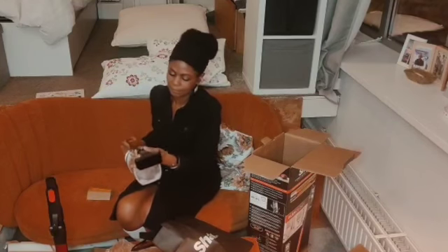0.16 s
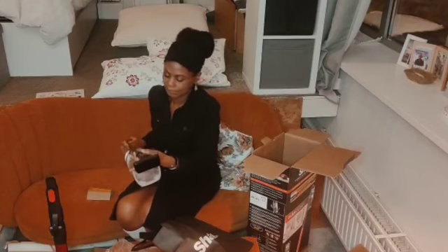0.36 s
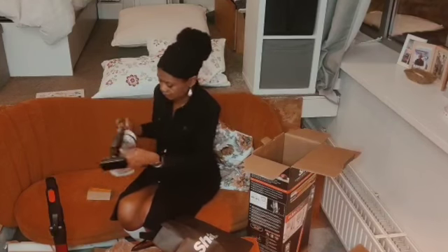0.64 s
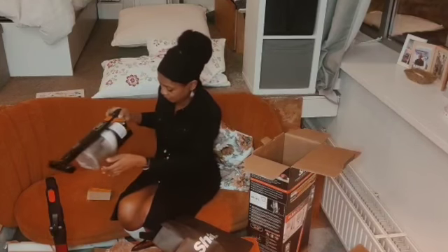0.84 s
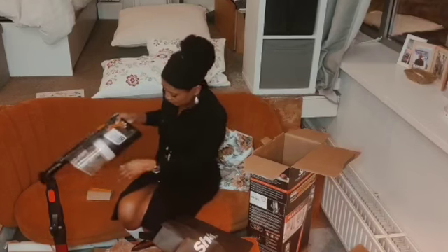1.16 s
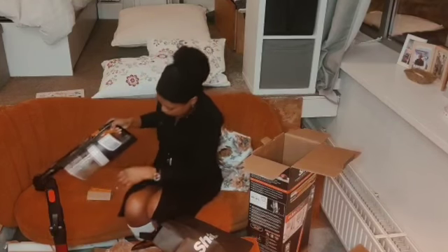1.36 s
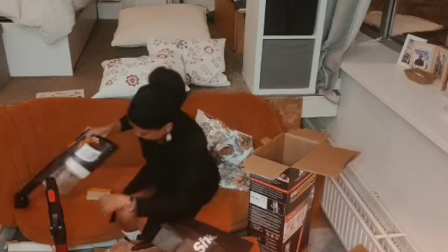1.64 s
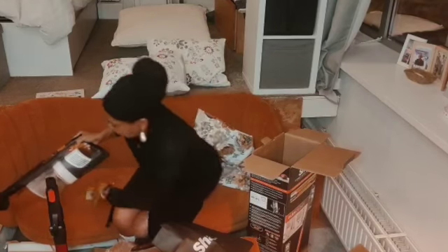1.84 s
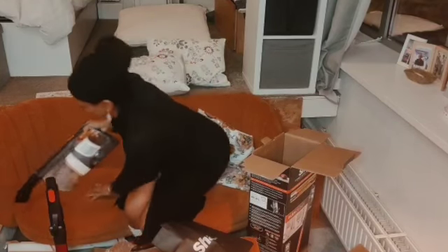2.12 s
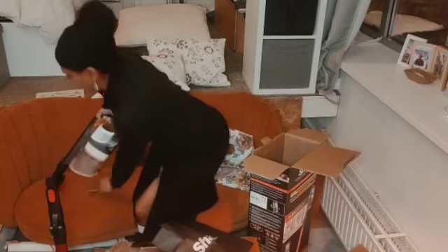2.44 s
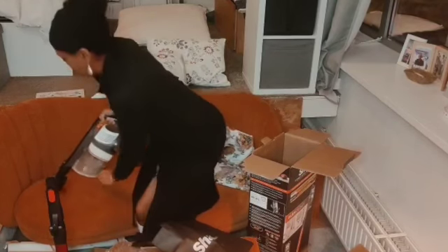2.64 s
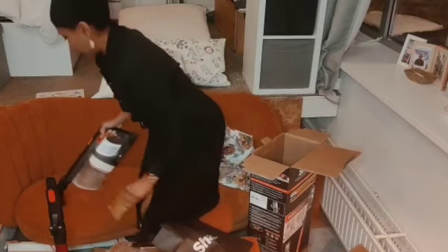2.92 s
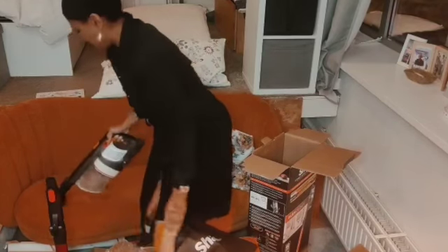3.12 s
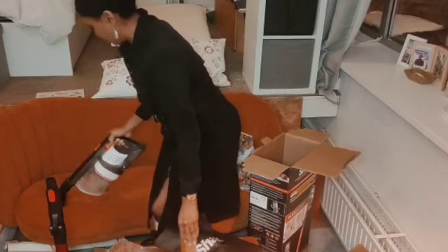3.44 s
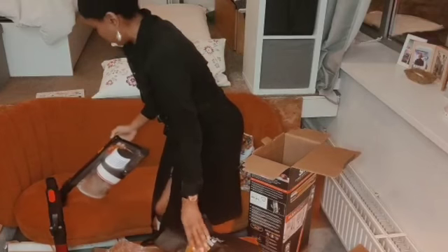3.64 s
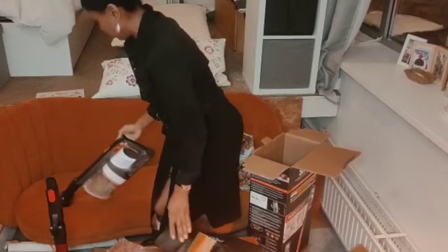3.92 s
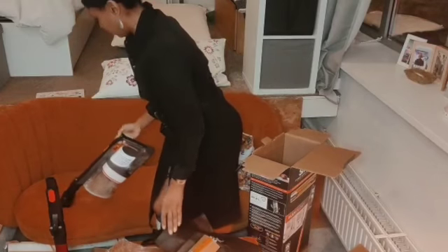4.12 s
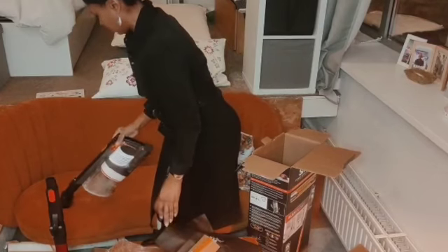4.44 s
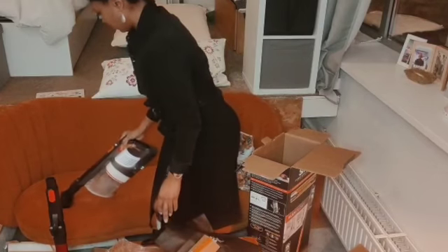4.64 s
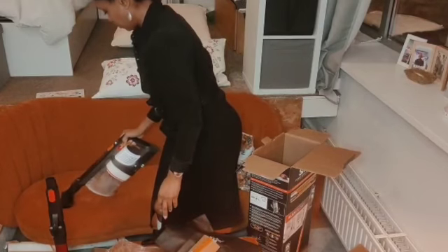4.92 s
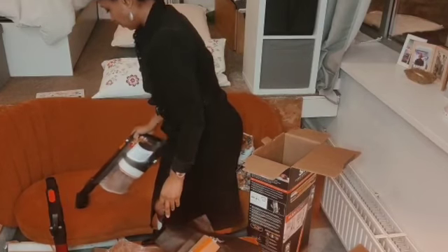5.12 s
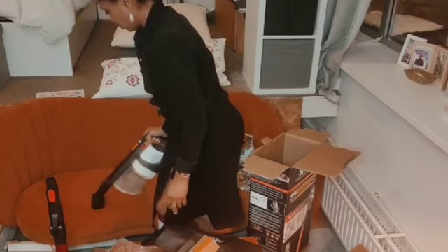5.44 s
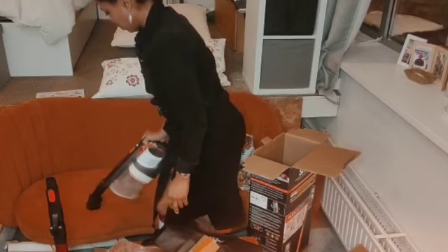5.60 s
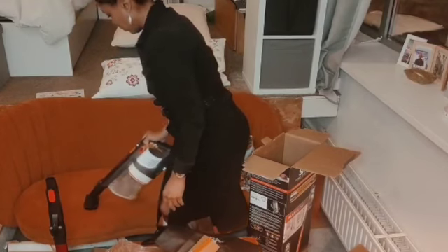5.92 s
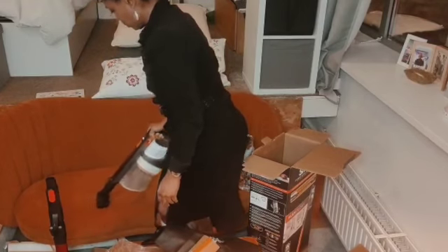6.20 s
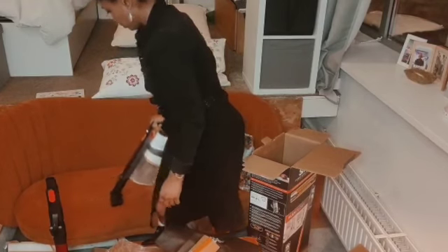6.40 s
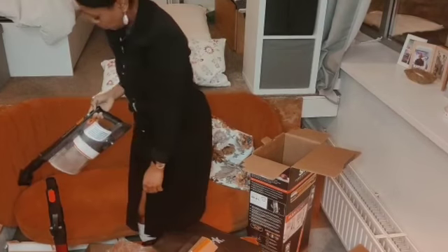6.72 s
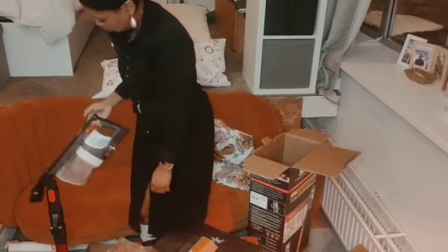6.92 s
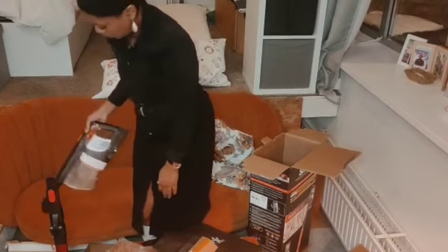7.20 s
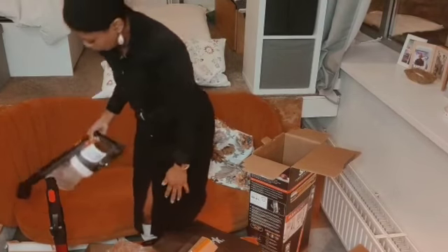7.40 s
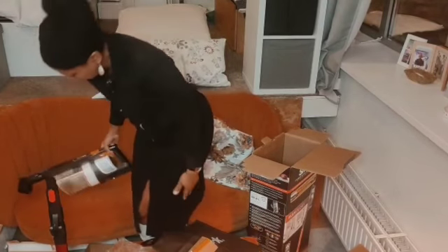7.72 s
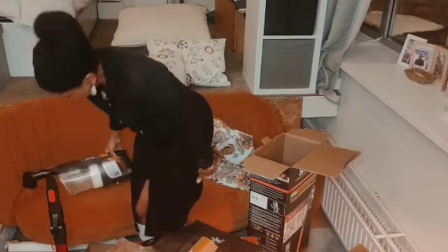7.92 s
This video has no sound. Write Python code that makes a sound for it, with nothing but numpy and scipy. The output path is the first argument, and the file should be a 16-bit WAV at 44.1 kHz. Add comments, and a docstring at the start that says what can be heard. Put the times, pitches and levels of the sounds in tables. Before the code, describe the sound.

A sharp plastic snap from a handheld vacuum opens the scene, heard in stereo in a small, quiet room. Cloth brushes and a hand slides over upholstery as a knee lands on a sofa with a dull thump. Light taps on a table follow. Then the vacuum spins up with a rising whine and airy hiss, runs for about two seconds, dulls as the nozzle meets the cushion, and coasts down with a falling whistle.

```python
"""A dust bin snaps shut in a small room: impacts ring the plastic shell of a handheld vacuum. Cloth rustles by
friction, a hand slides, a knee thumps the sofa and a small part taps on the table. The switch clicks; the motor
spins up with a whine, labours as the nozzle seals on the cushion; at 6.56 s its tones and rush fall abruptly,
and it coasts down. Its tones are multiples of the shaft's rotation rate, and the same rate governs the
turbulent rush of air."""
import sys
import numpy as np
from scipy import signal
from scipy.fft import rfft, irfft, next_fast_len
from scipy.io import wavfile
from scipy.ndimage import uniform_filter1d

SR = 44100
rng = np.random.default_rng(int(sys.argv[2]) if len(sys.argv) > 2 else 0)


def waveform_to_disk(signal):
    """Save audio, clipped to [-1, 1], as 16-bit WAV at the path in sys.argv[1]."""
    frames = np.transpose(np.atleast_2d(signal))
    scaled = np.clip(frames, -1, 1) * 32767
    samples = np.round(scaled).astype(np.int16)
    wavfile.write(sys.argv[1], SR, samples)


N = 355269
TIME = np.arange(N) / SR
SWITCH_ON_S, SEAL_S, SPEED_DROP_S = 4.608, 5.88, 6.557
GOVERNED_HZ = 1136  # full shaft speed

# Reverberation time of the room: frequency_hz, t60_s
ROOM_DECAY = [(100, 0.97), (300, 0.36), (700, 0.43), (2000, 0.4), (4000, 0.4), (5500, 0.38), (8000, .28),
              (12000, 0.25)]
# Broad spectra of room noise, cloth, taps, clicks and rushing air: frequency_hz, gain_db
ROOM_SPECTRUM = [(18, -42.5), (30, -10), (65, -26), (91, -6.5), (156, -13), (223, -7), (267, -19.5),
                 (691, -16.5), (1070, -21), (14000, -29)]
CLOTH_SPECTRUM = [(30, -5.5), (60, -0.5), (100, 9), (200, 11), (400, 8.5), (900, 5), (1500, 1.5),
                  (2600, 0.5), (5000, 0), (6500, 1.5), (7600, -0.5), (9500, -7.5), (14000, -15)]
TAP_SPECTRUM = [(80, -30.5), (170, -13.5), (300, -12.5), (800, -5.5), (2000, 4), (4500, -2.5), (6500, 2.5),
                (9000, -3.5), (14000, -14)]
CLICK_SPECTRUM = [(40, -43.5), (90, -29.5), (180, -18.5), (330, -10), (520, -17.5), (950, -11), (1800, 1),
                  (2900, -2), (4000, -6), (5400, -7), (7300, -3.5), (9800, -12), (14000, -21)]
AIR_SPECTRUM = [(40, -38), (80, -27.5), (150, -14.5), (280, -12.5), (450, -7), (750, -5), (1100, -5),
                (1700, -5.5), (2500, -7.5), (4500, -2.5), (6400, -5.5), (7500, -8), (10500, -18),
                (14000, -29)]
# Resonances: centre_hz, width_hz, lift_db
ROOM_MODES = [(105, 5, 2.3)]
PART_MODES = [(175.4, 14, 14.5), (958, 15, 12), (1310, 34, 6), (1750, 75, 4), (2280, 50, 4.5),
              (2800, 65, 0), (3210, 55, 9.5), (4040, 64, 9.5)]  # small part and table
SHELL_MODES = [(578, 8.9, 15.5), (1476, 15, 9), (1680, 30, -2), (1755, 29, 6.5), (2200, 30, 2.5),
               (2540, 17, 7.5), (2780, 30, 5.5), (3260, 210, 3), (5150, 90, 10), (5200, 35, 5),
               (5810, 89, 9.5), (6800, 69, 4.5)]  # plastic shell
DUCT_MODES = [(592, 17, 8), (635, 48, 3.5), (935, 36, 6.5), (1140, 87, 5), (1510, 300, 4.5),
              (6200, 710, 2.5)]  # air in the nozzle and bin
HOUSING_MODES = [(372, 18.4, 15.5), (556, 38, 13), (828, 61, 16.5), (965, 10.5, 14), (1110, 14.5, 10.5)]  # motor housing

# Rustle of clothes as the body moves: time_s, level_db
RUSTLE_LEVELS = [(0, -70.5), (1.35, -76), (1.8, -68.5), (2.6, -59.5), (3.1, -60), (3.35, -58.5),
                 (3.5, -64.5), (3.95, -64), (4.45, -71), (7.5, -65), (7.95, -64), (8.05, -70)]
# Brushes of cloth and, at 7.55 s, a soft low rumble as the motor runs down:
# peak_s, level_db, rise_s, fall_s, brightness_db
SWELLS = [(.595, -65.5, .018, .02, 1.5), (.68, -63, 0.033, 0.032, 7), (1.72, -75, 0.18, 0.078, -13.5),
          (2.316, -43, 0.05, 0.056, 4), (2.495, -50.5, 0.059, 0.047, 3.5), (4.34, -64.5, 0.016, 0.08, -3),
          (7.55, -70.5, .35, 0.39, -9), (7.97, -68, .03, .06, -10.5)]
# A hand sliding over the upholstery: time_s, level_db, pitch_hz
HAND_PATH = [(1.95, -100, 1508), (2.08, -65, 1440), (2.18, -68, 1436), (2.26, -53, 1420), (2.31, -54, 1200),
             (2.36, -45.5, 1007), (2.42, -59, 944), (2.55, -100, 952)]
# Weight landing on the sofa: start_s, level_db
KNEE_LANDINGS = [(2.328, -20.5), (2.438, -34.5)]
# Modes of the sofa frame: pitch_hz, gain_db, t60_s
FRAME_MODES = [(96.6, -4.5, 0.19), (120, -3.5, 0.1), (208, -9.5, 0.24), (182, -16, 0.28),
               (330, -24.5, 0.25), (392, -20.5, 0.18)]
# Impacts, with band levels before trim: start_s, low_db, mid_db, high_db, contact_s
PART_TAPS = [(3.228, -57.5, -52.5, -54, 0.014), (3.248, -59, -48, -46.5, 0.0049),
             (3.456, -58.5, -56.5, -70, 0.005), (3.472, -70, -63, -61, 0.0042),
             (3.491, -63, -51, -51.5, 0.0066), (3.78, -47, -44, -44, 0.0078),
             (3.863, -64, -50, -54.5, 0.01), (3.8825, -40.5, -32.5, -38, 0.013)]
SHELL_CLICKS = [(0, -55, -33, -57, 0.027), (0.0145, -29.5, -15.5, -22.5, 0.0059),
                (0.812, -71.5, -58.5, -76, 0.008), (0.971, -71.5, -66.5, -60.5, 0.0028),
                (1.61, -66.5, -67, -60.5, 0.0036), (2.689, -63.5, -51, -45, 0.0011),
                (2.776, -49.5, -44.5, -53, 0.005), (4.553, -61.5, -53.5, -47, 0.0034),
                (7.523, -46.5, -51, -62, 0.027), (7.568, -59, -54, -62, 0.0052),
                (7.783, -99, -57, -54, 0.0017)]

# Roar, hiss and fizz of the air: full_speed_db, slope_db_per_decade, jet_change_db, seal_change_db
AIR_BANDS = [(-28.5, 53, -6, -1.5), (-31.5, 44.5, 1, -0.14), (-37, 47, 5, -1.5)]
# Narrow noise bands of the vents and of the nozzle's pipe modes: centre_hz, width_hz, gain_db
VENT_BANDS = [(11860, 1100, -50), (13700, 520, -49.5)]
NOZZLE_MODES = [(564, 13.5, 5), (599, 13, -5)]
# Blade whistle while coasting: pitch_hz, level_db
COAST_WHISTLE = [(2100, -95.5), (3000, -66.5), (3800, -51), (5500, -51.5), (6500, -48), (9200, -60)]
# Bearing tones: multiple of shaft speed; gain_db relative to the air's hiss
BEARING_MULTIPLES = (4, 4.91, 5.9)
BEARING_GAINS = (-42, -35, -39)
# The whine swelling and fading as the vacuum is swung about: time_s, level_db
WHINE_LEVELS = [(5.0, -32), (5.32, -36), (5.43, -29), (5.55, -34), (5.68, -28.5), (5.8, -49), (5.87, -28.5),
                (6.05, -43.5), (6.22, -30.5), (6.35, -38), (6.44, -25.5), (6.55, -23.5), (6.58, -48),
                (6.64, -41), (6.74, -28)]

# Likeness of the two channels: frequency_hz, coherence
COHERENCE = [(30, 0.85), (70, 0.64), (130, 1), (250, 0.09), (500, 0.88), (1000, 0.12), (3000, 0.17),
             (12000, .3)]
# Left channel relative to right: frequency_hz, gain_db
LEFT_BALANCE = [(30, 2), (80, -9), (250, -8.5), (500, -8.5), (1000, -8), (2000, -5.5), (4500, -7),
                (8000, -13.5), (13000, -11.5)]


def amp(db):
    """Amplitude ratio of a level in decibels."""
    return 10 ** (np.asarray(db) / 20)


def unit_rms(x):
    """Normalises each channel to rms 1."""
    return x / np.sqrt(np.mean(x ** 2, -1, keepdims=True) + 1e-20)


def at_frequency(points, hz):
    """Interpolates a table on a logarithmic frequency axis."""
    f, value = np.transpose(points)
    return np.interp(np.log(hz + 1), np.log(f), value)


def curves(rows):
    """Interpolates each column of a time table at every sample."""
    s, *columns = np.transpose(rows)
    return [np.interp(TIME, s, c) for c in columns]


def since(s):
    """Seconds elapsed since s, zero before it."""
    return np.maximum(TIME - s, 0)


def add(mix, start_s, sound):
    """Superposes a sound on the mix."""
    part = mix[:, max(round(start_s * SR), 0):][:, :sound.shape[-1]]
    part += sound[..., :part.shape[1]]


def wander(rate_hz):
    """Random modulation: straight lines between Gaussian values."""
    knots = rng.standard_normal(N // 20)
    return np.interp(TIME * rate_hz, np.arange(len(knots)), knots)


def filtered(x, order, hz, kind):
    """Filter with a maximally flat passband."""
    return signal.sosfilt(signal.butter(order, hz, kind, fs=SR, output="sos"), x)


def bands(x, low_hz):
    """Crossover into low, middle and high bands."""
    edges = [(low_hz, "low"), ((low_hz, 7000), "band"), (7000, "high")]
    return [filtered(x, 5, hz, kind) for hz, kind in edges]


def resonance_gain(modes, hz):
    """Resonances in series: their gains at hz multiply."""
    return np.prod([np.sqrt(1 + (amp(db) ** 2 - 1) / (1 + (2 * (hz - centre) / width) ** 2))
                    for centre, width, db in modes], 0)


def coloured(x, spectrum, modes=(), size=8192):
    """Minimum-phase filter: ringing resonances stand on a broad spectrum."""
    hz = abs(np.fft.fftfreq(size, 1 / SR))
    gain = amp(at_frequency(spectrum, hz)) * resonance_gain(modes, hz)
    transfer = np.exp(np.conj(signal.hilbert(np.log(gain))))
    response = np.fft.ifft(transfer).real[:size // 2]
    return signal.oaconvolve(x, response[None], axes=1)[:, :x.shape[1]]


def narrow_noise(hz, width_hz):
    """Quadrature modulation: slow noise shifted to a band around hz, rms 1."""
    drift = filtered(rng.standard_normal((2, 2, N)), 2, width_hz / 2, "low")
    angle = 2 * np.pi * np.cumsum(hz * np.ones(N)) / SR
    return unit_rms(drift[0] * np.cos(angle) + drift[1] * np.sin(angle))


def room_tail(size=20000):
    """Diffuse reflections of energy 1 decay exponentially, the treble first."""
    hz, t, spectra = signal.stft(rng.standard_normal((2, size)), SR, nperseg=256)
    decay = amp(-60 * t / at_frequency(ROOM_DECAY, hz)[:, None])
    tail = signal.istft(spectra * decay, SR)[1][:, :size]
    onset = 1 - np.exp(-np.arange(size) / SR / .003)
    return unit_rms(tail * onset) / np.sqrt(size)


def in_room(x, wet_db):
    """Direct and reverberant fields add, scaled to keep about the same power."""
    wet = signal.oaconvolve(np.atleast_2d(x), room_tail(), axes=1)[:, :N]
    return (x + amp(wet_db) * wet) / np.sqrt(1 + amp(wet_db) ** 2)


def smeared_tone(angle, wet_db=0.55):
    """Interference with its own reflections blurs a gliding tone, held at steady power."""
    tone = in_room(np.sin(angle), wet_db)
    return tone / np.sqrt(abs(uniform_filter1d(tone ** 2, 2600)) + 1e-6)


def room_noise(level_db=-70, drift_db=0.95):
    """Faint ambient noise excites one low standing wave."""
    noise = coloured(rng.standard_normal((2, N)), ROOM_SPECTRUM, ROOM_MODES)
    return unit_rms(noise) * amp(level_db + drift_db * wander(10))


def cloth(grain_db=1.5, uneven_db=0.73, band_db=(-4.5, 0, -3.5)):
    """Stick-slip friction of fibres rustles; brushes and a late, soft rumble add to it in power."""
    slips = in_room(rng.standard_normal((2, N)) * amp(grain_db * wander(250)), wet_db=-5)
    power = amp(curves(RUSTLE_LEVELS)[0] + uneven_db * wander(12)) ** 2
    for s, db, rise, fall, bright_db in SWELLS:
        swell = np.exp(-np.maximum((s - TIME) / rise, (TIME - s) / fall))
        power = power + (amp([[db - bright_db], [db], [db + bright_db]]) * swell) ** 2
    parts = bands(coloured(slips, CLOTH_SPECTRUM), low_hz=900)
    return sum(unit_rms(part) * np.sqrt(p) * amp(db) for part, p, db in zip(parts, power, band_db))


def hand_slide():
    """Sliding friction of skin on velvet: a band of noise sinking in pitch."""
    db, hz = curves(HAND_PATH)
    return amp(db) * narrow_noise(hz, width_hz=600)


def knee_thumps(rise_s=0.00224, lowest_hz=82):
    """A soft, heavy push excites damped modes of the sofa frame, which radiates little deep bass."""
    out, t = np.zeros((2, N)), np.arange(SR) / SR
    ring = sum(amp(db - 60 * t / t60) * np.sin(2 * np.pi * hz * t) for hz, db, t60 in FRAME_MODES)
    for s, db in KNEE_LANDINGS:
        add(out, s, amp(db) * ring * (1 - np.exp(-t / rise_s)))
    return in_room(filtered(out, 5, lowest_hz, "high"), wet_db=-11)


def impacts(rows, spectrum, modes, room_db, trim_db):
    """Impact excitation: a brief chatter of contacts and its reflections, coloured by the struck body."""
    out = np.zeros((2, N))
    for s, *levels, contact_s in rows:
        tail = room_tail()
        t = np.arange(tail.shape[1]) / SR
        chatter = unit_rms(rng.standard_normal(tail.shape) * np.exp(-t / contact_s)) / np.sqrt(len(t))
        ring = coloured(chatter + amp(room_db) * tail, spectrum, modes)
        for part, db in zip(bands(ring, low_hz=800), levels):
            attack_rms = np.sqrt(np.mean(part[:, t < .03] ** 2))
            add(out, s, amp(db + trim_db) * part / attack_rms)
    return out


def coasting(step_s=0.0045):
    """0 under power, 1 once the rotor runs on inertia."""
    return np.clip((TIME - SPEED_DROP_S) / step_s + .5, 0, 1)


def sealed(close_s=0.023):
    """1 while suction holds the nozzle on the cushion."""
    return np.minimum(since(SEAL_S) / close_s, 1) * (1 - coasting())


def shaft_hz(free_hz=1179, spin_up_s=.358, loaded_hz=1120.5, sag_s=.12,
             step_to_hz=840, friction_hz_per_s=165, drag_from_s=6.703, drag_s=.505):
    """Speed rises to a governed limit, sags under load, steps down, then decays by friction and drag."""
    free = 1 + free_hz * (1 - np.exp(-since(SWITCH_ON_S) / spin_up_s))
    held = loaded_hz + (GOVERNED_HZ - loaded_hz) * np.exp(-since(SEAL_S) / sag_s)
    coast = (step_to_hz - friction_hz_per_s * since(SPEED_DROP_S)) / (1 + since(drag_from_s) / drag_s)
    return np.where(TIME < SPEED_DROP_S, np.minimum(free, held), coast)


def by_speed(db_per_decade):
    """Power law of shaft speed, in dB relative to full speed."""
    return db_per_decade * np.log10(shaft_hz() / GOVERNED_HZ)


def air_levels(jet_exponent=13.6):
    """Power laws set roar, hiss and fizz in dB; an open nozzle jets brightly, a sealed one is duller."""
    seal = sealed()
    jet = (shaft_hz() / GOVERNED_HZ) ** jet_exponent * (1 - seal)
    return [db + by_speed(slope) + jet_db * jet + seal_db * seal
            for db, slope, jet_db, seal_db in AIR_BANDS]


def vents(onset_hz=380):
    """Flow through narrow vents sings above the hiss, fading at shaft speeds below onset_hz."""
    gain = amp(by_speed(35)) / np.hypot(1, (onset_hz / shaft_hz()) ** 4)
    return gain * sum(amp(db) * narrow_noise(hz, width) for hz, width, db in VENT_BANDS)


def nozzle_hoot(sealed_db=-40, fade_db_per_s=0.5, coast_db=-46):
    """Pipe resonance: two close modes hoot in the sealed nozzle, and faintly as the rotor coasts."""
    hoot = unit_rms(sum(amp(db) * narrow_noise(hz, width) for hz, width, db in NOZZLE_MODES))
    sucking = sealed() * amp(sealed_db - fade_db_per_s * since(SEAL_S))
    dying = coasting() * amp(coast_db + by_speed(38.5))
    return (sucking + dying) * hoot


def fan_whistle(blades=11, run_db=-42, sealed_db=-8, patchy_db=3):
    """Blade-passing tone in unsteady air: thin near full speed, broad and patchy while coasting."""
    hz, off = blades * shaft_hz(), coasting()
    run = amp(run_db + by_speed(270) + sealed_db * sealed()) * narrow_noise(hz, width_hz=70)
    coast = amp(at_frequency(COAST_WHISTLE, hz) + patchy_db * wander(22)) * narrow_noise(hz, 300)
    return run * (1 - off) + coast * off


def airflow(flutter_db=0.6):
    """Broadband turbulence excites the cavity resonances of the nozzle and bin."""
    rush = coloured(in_room(rng.standard_normal((2, N)), wet_db=-3.5), AIR_SPECTRUM, DUCT_MODES)
    air = sum(unit_rms(part) * amp(db) for part, db in zip(bands(rush, low_hz=2050), air_levels()))
    return air * amp(flutter_db * wander(25))


def rotor_hum(angle, base_db=-48.5, sealed_db=-13, coast_db=-3, flicker_db=3.5):
    """Forced vibration: imbalance shakes the housing once a turn, most strongly at its resonances."""
    db = base_db + by_speed(24) + sealed_db * sealed() + coast_db * coasting() + flicker_db * wander(14)
    return amp(db) * resonance_gain(HOUSING_MODES, shaft_hz()) * smeared_tone(angle)


def motor_whine(angle, open_hz=1493, edge_hz=69, shut_db=-17, db_per_decade=47):
    """The shaft's second harmonic; the housing's transmission loss muffles it below open_hz."""
    hz = 2 * shaft_hz()
    shut = .5 - .5 * np.tanh((hz - open_hz) / edge_hz)
    muffled_db = shut * (shut_db + db_per_decade * np.log10(hz / open_hz))
    return amp(curves(WHINE_LEVELS)[0] + muffled_db) * smeared_tone(2 * angle)


def motor(lowest_hz=356):
    """Hum, whine and bearing tones are orders of one rotation, which runs less true while coasting."""
    off = coasting()
    jitter = (0.0021 + 0.0213 * np.minimum(since(SPEED_DROP_S), .6)) * wander(200)
    sway = (0.0014 + 0.00217 * off) * wander(18)
    angle = 2 * np.pi * np.cumsum(shaft_hz() * (1 + jitter + sway)) / SR
    bearings = sum(amp(db) * np.sin(k * angle) for k, db in zip(BEARING_MULTIPLES, BEARING_GAINS))
    hiss_db = air_levels()[1]
    tones = rotor_hum(angle) + motor_whine(angle) + amp(hiss_db) * bearings
    tones *= abs(2 * off - 1)  # a brief gap in the tones where the pitch jumps down
    return filtered(tones, 4, lowest_hz, "high")  # a small body radiates little bass


def scene():
    """Superposition of all sources; the machine is silent until switched on."""
    switched_on = np.minimum(since(SWITCH_ON_S) / 0.036, 1)
    machine = (motor() + fan_whistle() + airflow() + vents() + nozzle_hoot()) * switched_on
    clicks = impacts(SHELL_CLICKS, CLICK_SPECTRUM, SHELL_MODES, room_db=3, trim_db=-1.5)
    taps = impacts(PART_TAPS, TAP_SPECTRUM, PART_MODES, room_db=1.5, trim_db=-4.0)
    return machine + clicks + taps + knee_thumps() + cloth() + hand_slide() + room_noise()


def record(dry, lag_s=.00009, cutoff_hz=14500):
    """Partial coherence at two close, band-limited microphones; the left is weaker and a little late."""
    size = next_fast_len(N + SR // 10)
    hz = np.fft.rfftfreq(size, 1 / SR)
    left, right = rfft(dry, size)
    coherence = np.clip(at_frequency(COHERENCE, hz), 0, 1)
    shared = coherence * right * np.exp(-2j * np.pi * hz * lag_s)
    left = (shared + np.sqrt(1 - coherence ** 2) * left) * amp(at_frequency(LEFT_BALANCE, hz))
    pair = irfft(np.array([left, right]), size)[:, :N]
    lowpass = signal.firwin(511, cutoff_hz, window=("kaiser", 9), fs=SR)
    return signal.oaconvolve(pair, lowpass[None], "same")


dry = scene()
out = record(dry)
waveform_to_disk(out)
```